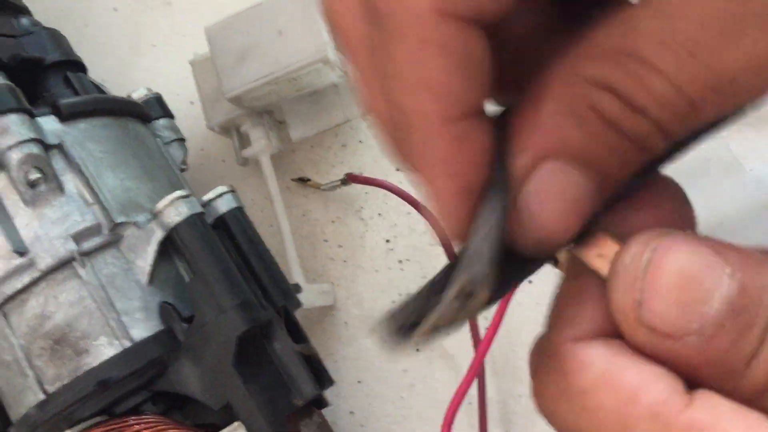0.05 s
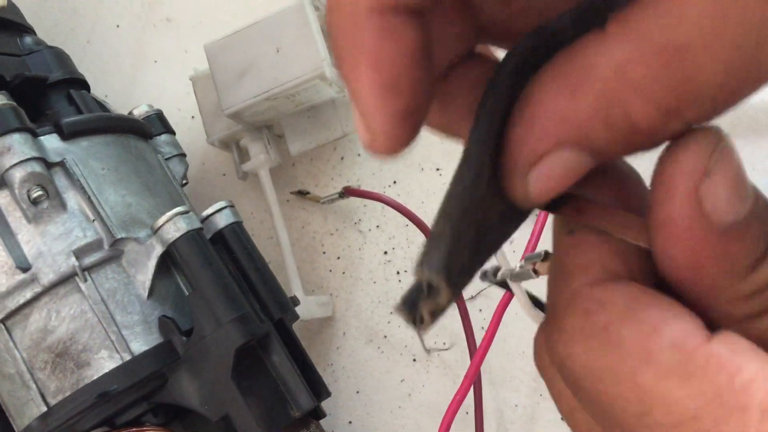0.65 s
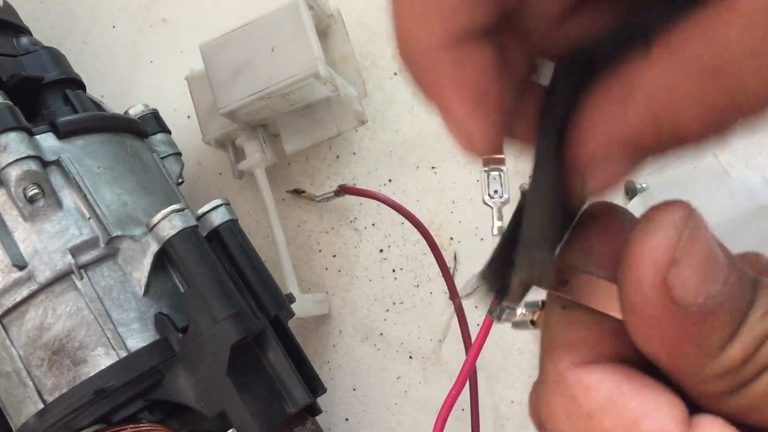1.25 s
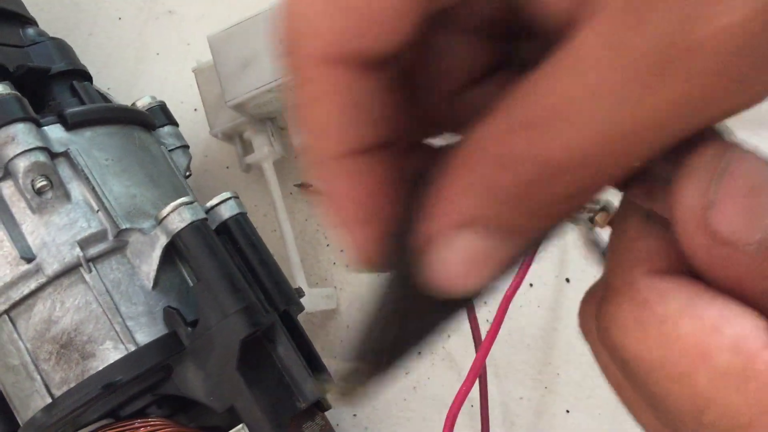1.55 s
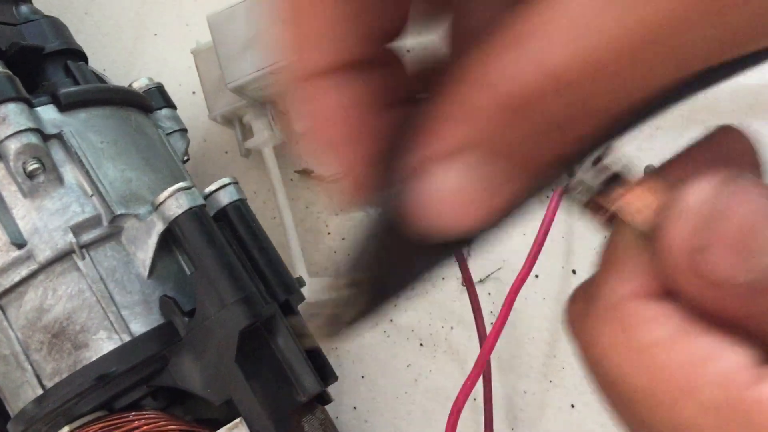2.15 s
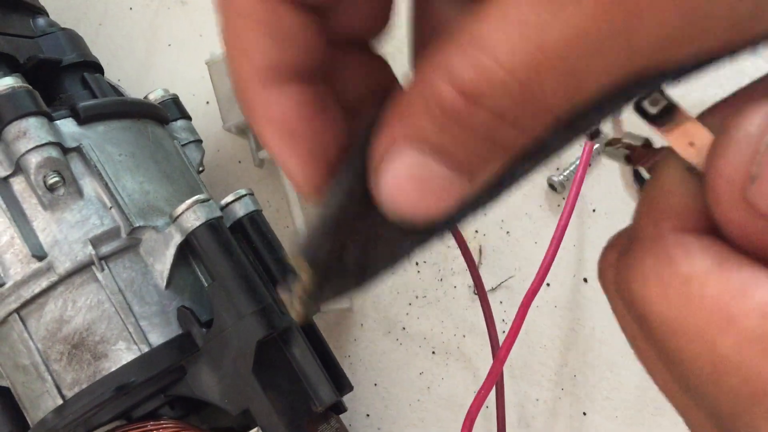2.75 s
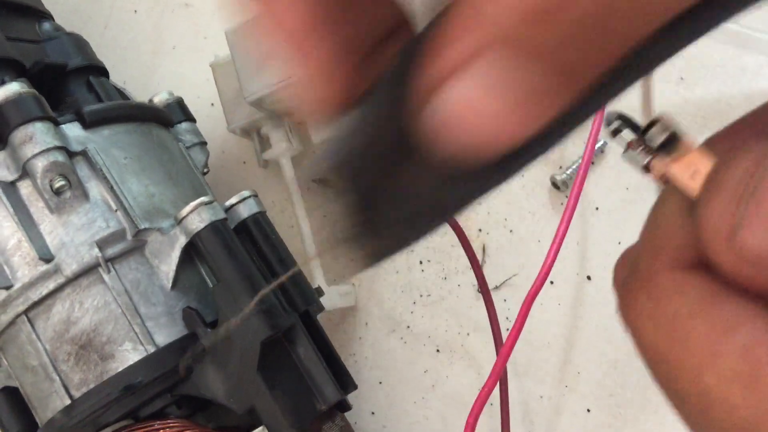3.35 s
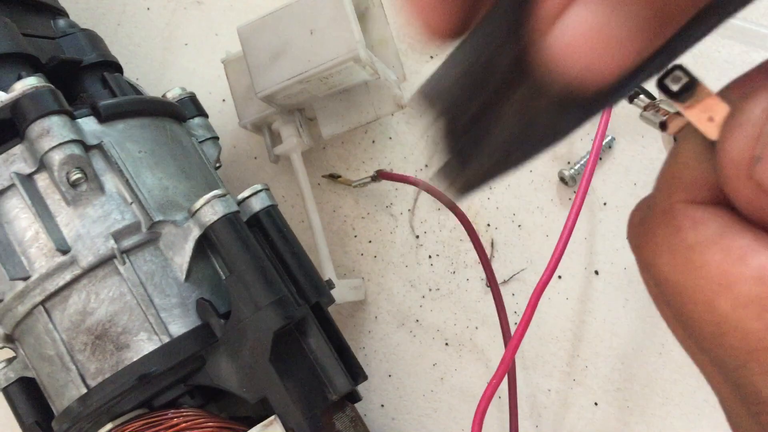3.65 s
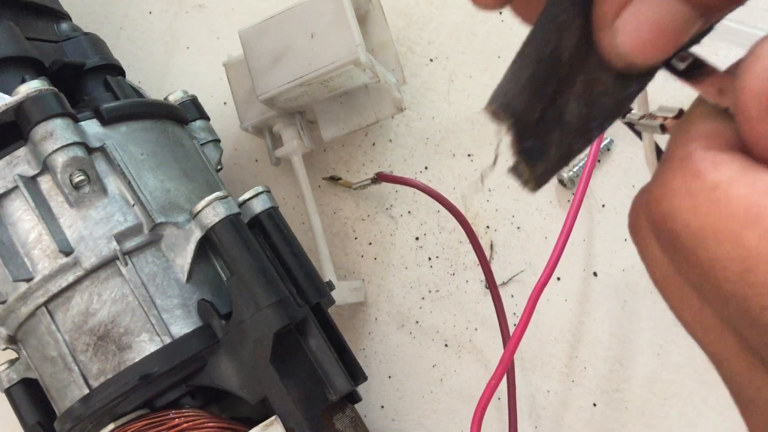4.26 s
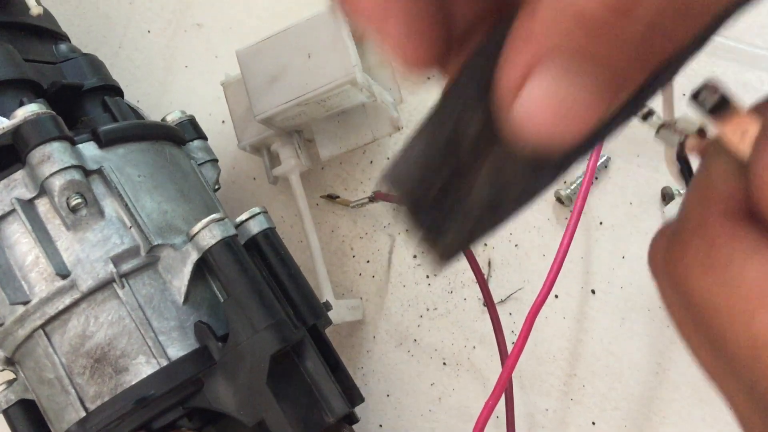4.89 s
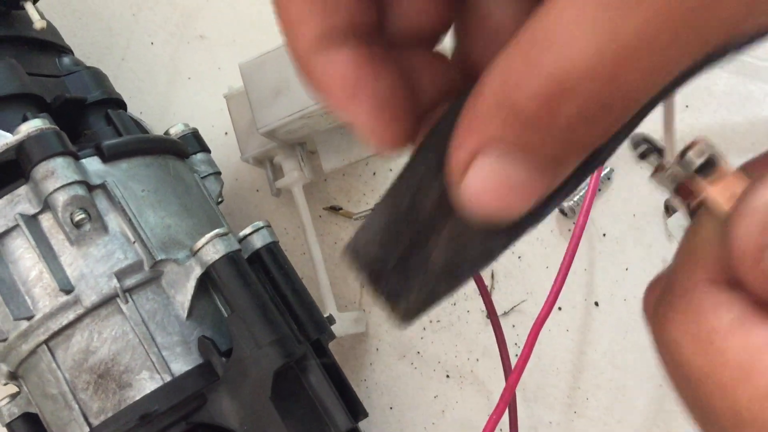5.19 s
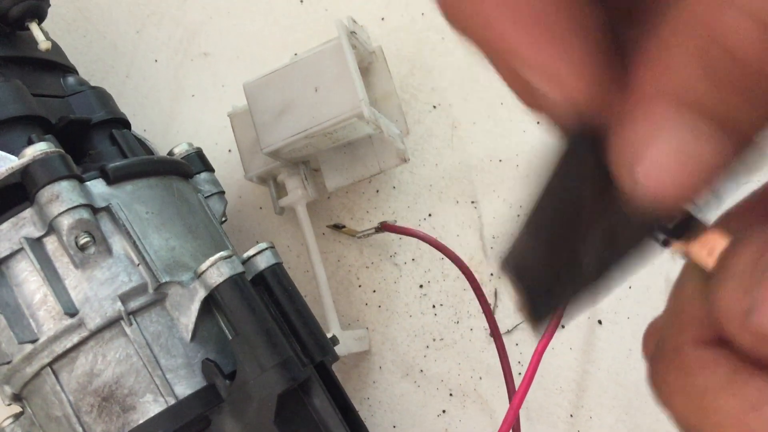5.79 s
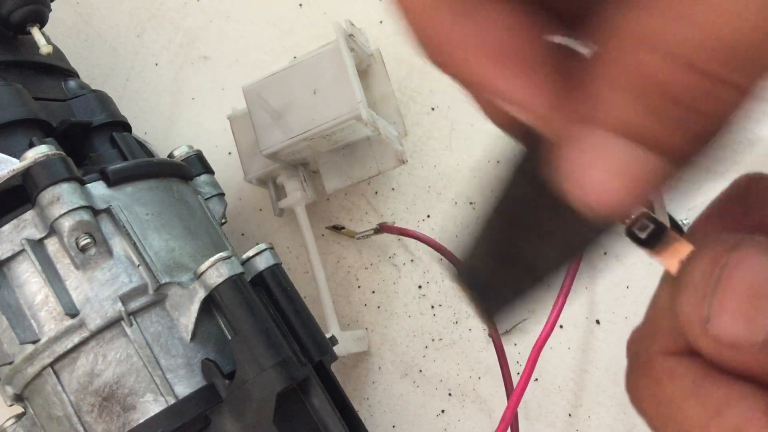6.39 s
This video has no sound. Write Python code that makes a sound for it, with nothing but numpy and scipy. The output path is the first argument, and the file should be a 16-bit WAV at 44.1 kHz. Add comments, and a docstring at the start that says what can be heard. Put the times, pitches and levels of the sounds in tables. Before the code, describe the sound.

Sandpaper rubs over a small metal contact in quick, scratchy strokes with short pauses, close by in a quiet room.

```python
"""Folded fine sandpaper is rubbed in quick strokes over a small hand-held metal contact, close by.
Its sound is friction noise, the sum of thousands of grain impacts a second. Each stroke lands with a
scuff, swells as the grit bites and lets go; many snag on the metal's edge, and the freed sheet flaps
with a soft thump. The paper's edge taps the metal, and a fingertip squeaks once by stick-slip.
A small room adds a short reverberant tail over a low background hum."""
import sys
import numpy as np
from scipy import signal
from scipy.fft import rfft, irfft, next_fast_len
from scipy.io import wavfile
from scipy.ndimage import uniform_filter1d

SR = 44100
rng = np.random.default_rng(int(sys.argv[2]) if len(sys.argv) > 2 else 0)


def master_out(mix):
    """Clip the mix to full scale and print it as 16-bit PCM to the path in sys.argv[1]."""
    frames = np.transpose(np.atleast_2d(mix))
    ceiling = np.clip(frames, -1, 1)
    pcm = np.round(ceiling * 32767).astype(np.int16)
    wavfile.write(sys.argv[1], SR, pcm)


N = 283563
FFT_SIZE = 2 * next_fast_len(N // 2 + 1)
TIME, FREQ = np.arange(N) / SR, np.fft.rfftfreq(FFT_SIZE, 1 / SR)


def gain_of(db):
    """The decibel scale: 20 dB is a factor of ten in amplitude."""
    return 10 ** (np.asarray(db) / 20)


def unit_rms(x):
    """Normalisation to a mean power of 1."""
    return x / np.sqrt(np.mean(x ** 2) + 1e-20)


def curve_at(points, hz):
    """Linear interpolation of (Hz, value) points on a log-frequency axis."""
    point_hz, value = np.transpose(points)
    return np.interp(np.log(hz + 1), np.log(point_hz + 1), value)


def coloured(x, gain):
    """Filtering as multiplication of the spectrum; the result has rms 1."""
    return unit_rms(irfft(rfft(x, FFT_SIZE) * gain, FFT_SIZE)[:N])


def noise(spectrum):
    """Stationary Gaussian noise shaped by (Hz, dB) points."""
    return coloured(rng.standard_normal(N), gain_of(curve_at(spectrum, FREQ)))


def wander(rate_hz):
    """Random modulation: low-pass noise of rms 1."""
    return coloured(rng.standard_normal(N), 1 / (1 + (FREQ / rate_hz) ** 4))


# Ambient room noise. Each row: frequency in Hz, relative spectral density in dB.
AIR_SPECTRUM = [(25, -47), (40, -32), (60, 4.5), (90, -9.5), (160, -2.5), (260, -4.5), (340, -14.5),
                (480, -19.5), (700, -14), (1100, -21), (2600, -26), (5000, -32.5), (9000, -34),
                (16000, -48)]
# Mains harmonics. Each row: frequency in Hz, level in dB.
HUM_PARTIALS = [(59.5, -68.5), (119, -66), (237, -74)]

def background(air_db=-60.5, waver_db=4.5):
    """Superposition of low room noise and mains hum whose harmonics waver independently."""
    hum = sum(gain_of(db + waver_db * wander(3.4)) * np.sin(2 * np.pi * (hz * TIME + rng.random()))
              for hz, db in HUM_PARTIALS)
    return gain_of(air_db) * noise(AIR_SPECTRUM) + np.sqrt(2) * hum


# Reverberation time. Each row: frequency in Hz, time to fall 60 dB in seconds.
ROOM_T60 = [(100, 0.67), (250, 0.48), (700, 0.25), (2500, 0.31), (6000, 0.38), (10000, 0.22), (16000, 0.45)]
# Colour of the reflections. Each row: frequency in Hz, relative level in dB.
REFLECTION_SPECTRUM = [(150, 9.5), (400, 11), (700, 11.5), (1500, 1), (2400, 3), (3600, -1), (6000, 3),
                       (16000, -4)]

def room(x, first_s=0.0021, reflections_per_s=5000):
    """Reverberation: convolution with sparse reflections, each band decaying at its own rate."""
    echoes = rng.choice([-1., 1.], SR) * (rng.random(SR) < reflections_per_s / SR)
    echoes *= np.arange(SR) > first_s * SR
    hz, t, spectra = signal.stft(echoes, SR, nperseg=256)
    fade_db = curve_at(REFLECTION_SPECTRUM, hz)[:, None] - 60 * t / curve_at(ROOM_T60, hz)[:, None]
    tail = signal.istft(spectra * gain_of(fade_db), SR, nperseg=256)[1]
    return signal.fftconvolve(x, tail / np.linalg.norm(tail))[:N]


# Rumble of the hands. Each row: frequency in Hz, relative spectral density in dB.
RUMBLE_SPECTRUM = [(30, -33), (62, 0), (78, -1), (100, -10), (160, -4), (400, -52)]

def hand_rumble(rest_db=-66, swing_db=-59, swing_s=0.12, lag_s=0.12, waver_db=2):
    """Amplitude-modulated noise: the low sound of the hands swells with the swing of each stroke."""
    hardest_db = max(crest_db for _, _, _, _, _, crest_db, *_ in RUB_STROKES)
    swings = sum(gain_of((crest_db - hardest_db) / 2) * np.exp(-((TIME - start - lag_s) / swing_s) ** 2)
                 for start, _, _, _, _, crest_db, *_ in RUB_STROKES)
    envelope = gain_of(rest_db) + gain_of(swing_db) * swings
    return envelope * gain_of(waver_db * wander(6.6)) * noise(RUMBLE_SPECTRUM)


def shifting_resonances(x, depth_db):
    """Time-varying filtering: resonances come and go as the touching point travels over the sheet."""
    spectra = signal.stft(x, SR, nperseg=256, noverlap=192)[2]
    patches = uniform_filter1d(rng.standard_normal(spectra.shape), size=2, axis=0)  # across frequency
    patches = uniform_filter1d(patches, size=22, axis=1)  # across time
    spectra *= gain_of(depth_db * np.clip(unit_rms(patches), -2, 2))
    return signal.istft(spectra, SR, nperseg=256, noverlap=192)[1][:N]


# Fingers shifting on the paper. Each row: time in seconds, relative level in dB.
FINGER_LEVELS = [(0.0, -57), (0.09, -74), (0.5, -73), (1.02, -67), (1.4, -75), (1.65, -74), (1.84, -74),
                 (2.0, -74), (2.45, -61.5), (2.6, -66), (2.88, -87), (2.96, -76), (4.33, -63.5),
                 (4.58, -77), (4.99, -72), (5.51, -75.5), (5.66, -82), (6.43, -67)]
# Skin rubbing paper. Each row: frequency in Hz, relative spectral density in dB.
SKIN_SPECTRUM = [(400, 5), (900, -15), (1600, 3), (2900, 6.5), (3900, 1), (5000, -7.5), (7000, -9),
                 (10000, -47), (16000, -26)]

def finger_rub(level_db=-3, flicker_db=1, ticks_per_s=6, tick_db=27):
    """Sliding friction of skin on paper: faint noise with a stray tick of grit now and then."""
    ticks = (rng.random(N) < ticks_per_s / SR) * rng.standard_normal(N) * gain_of(tick_db)
    slide = rng.standard_normal(N) / gain_of(flicker_db * wander(31))
    rub = shifting_resonances(slide + ticks, depth_db=5)
    envelope = gain_of(level_db + np.interp(TIME, *np.transpose(FINGER_LEVELS)))
    return envelope * coloured(rub, gain_of(curve_at(SKIN_SPECTRUM, FREQ)))


# A slipping fingertip. Each row: time in seconds, pitch in Hz, level in dB.
SQUEAK_GLIDE = [(2.09, 1155, -65.5), (2.097, 1000, -48), (2.105, 743, -62.5), (2.114, 610, -52),
                (2.134, 590, -70)]

def finger_squeak(jitter=0.112):
    """Stick-slip oscillation of skin on paper: a brief, uneven, falling tone."""
    times, hz, db = np.transpose(SQUEAK_GLIDE)
    cycles = np.cumsum(np.interp(TIME, times, hz) * (1 + jitter * wander(405))) / SR
    envelope = gain_of(np.interp(TIME, times, db)) * (TIME > times[0]) * (TIME < times[-1])
    return envelope * np.sqrt(2) * np.sin(2 * np.pi * cycles)


def struck(blows, modes, rise_s, detune):
    """Free vibration: each (seconds, dB) blow rings damped modes, detuned by the changing grip."""
    t, out = np.arange(SR // 2) / SR, np.zeros(N + SR)
    for start, blow_db in blows:
        ring = np.zeros(len(t))
        for hz, db, t60 in modes:
            cycles = rng.normal(1, detune) * hz * t + rng.random()
            ring += gain_of(db - 60 * t / t60) * np.sin(2 * np.pi * cycles)
        out[round(start * SR):][:len(t)] += gain_of(blow_db) * (1 - np.exp(-t / rise_s)) * ring
    return out[:N]


# Modes of the held sheet. Each row: frequency in Hz, relative level in dB, T60 in seconds.
FLAP_MODES = [(130.3, -9.5, 0.31), (170.7, 0.5, 0.14), (205.5, -10.5, 0.12), (259.8, -4.5, 0.13),
              (341, -7.5, 0.065), (403, -34.5, 0.19), (630.5, -14, 0.092), (796, -9.5, 0.055)]

def sheet_flaps(ease_share=0.5, slip_db=-43):
    """Elastic release: the sheet springs free as each stroke eases off and when the fingertip slips."""
    releases = [(start + skid + press + ease_share * ease, flap_db)
                for start, skid, press, ease, *_, flap_db in RUB_STROKES]
    slip_s = np.mean(SQUEAK_GLIDE, axis=0)[0]
    return struck(releases + [(slip_s, slip_db)], FLAP_MODES, rise_s=0.0019, detune=0.031)


# Flicks of paper on the contact. Each row: start in seconds, relative level in dB.
CONTACT_FLICKS = [(5.5342, -10.5)]
# Modes of the contact. Each row: frequency in Hz, relative level in dB, T60 in seconds.
CONTACT_MODES = [(2320, -3.5, 0.0061), (5580, -1.5, 0.0045), (5950, -5, 0.016), (8630, -3.5, 0.0069),
                 (9800, -10, .006)]

def contact_ring():
    """Damped resonance: the flicked metal rings only briefly between the fingers."""
    return struck(CONTACT_FLICKS, CONTACT_MODES, rise_s=0.0003, detune=0.003)


# Grit on metal. Each row: frequency in Hz, relative spectral density in dB.
GRIT_SPECTRUM = [(250, -11.5), (490, -14), (700, 0.5), (1050, -3.5), (1400, -2.5), (2100, -2), (3300, 0),
                 (3900, -5), (5000, -10), (6200, -5.5), (7800, -9), (9200, -5), (10400, -13.5),
                 (12500, -12), (15800, -21)]
# Resonances of paper and pinched contact. Each row: centre in Hz, bandwidth in Hz, lift in dB.
GRIT_RESONANCES = [(865, 240, -0.5), (1310, 35, 3.5), (2043, 760, 7), (2975, 110, 3), (4430, 770, 6),
                   (5610, 410, 4), (8730, 320, 2.5)]

def grit(per_s, spread_db, clump_db, clump_hz, body_top_hz=1300, fizz_foot_hz=4500):
    """Shot noise of uneven grains striking in clumps, in three bands: low body, mid rasp, high fizz."""
    sizes = gain_of(spread_db * np.minimum(rng.exponential(1, N), 4))
    hits = rng.choice([-1, 1], N) * sizes * (rng.random(N) < per_s / SR)
    hits *= gain_of(clump_db * np.clip(wander(clump_hz), -2, 2))
    hits = shifting_resonances(hits, depth_db=3)
    lift_db = sum(db / (1 + (2 * (FREQ - hz) / width) ** 2) for hz, width, db in GRIT_RESONANCES)
    colour = gain_of(curve_at(GRIT_SPECTRUM, FREQ) + lift_db)
    body = 1 / (1 + (FREQ / body_top_hz) ** 8)
    below_fizz = 1 / (1 + (FREQ / fizz_foot_hz) ** 8)
    return np.array([coloured(hits, colour * band) for band in (body, below_fizz - body, 1 - below_fizz)])


def band_gains(body_db, fizz_db):
    """Constant-power mix of body, rasp and fizz, with levels relative to the rasp."""
    gains = gain_of([body_db, np.zeros_like(body_db), fizz_db])
    return gains / np.linalg.norm(gains, axis=0)


def burst(bands, peak_s, rise_s, fall_s, body_db, fizz_db):
    """A noise transient: dense grit under an envelope that rises and decays exponentially."""
    on, out = abs(TIME - peak_s) < 0.03, np.zeros(N)
    t = TIME[on] - peak_s
    envelope = np.exp(-np.where(t < 0, -t / rise_s, t / fall_s))
    grains = band_gains(body_db, fizz_db) @ bands[:, on]
    out[on] = np.sqrt(np.mean(envelope ** 2)) * unit_rms(envelope * grains)
    return out


# Taps of the paper's edge. Each row: time in seconds, relative peak level in dB.
EDGE_TAPS = [(0.1555, -32.5), (0.8604, -53), (0.8767, -22.5), (0.97, -45), (1.0066, -44), (1.0854, -36),
             (1.111, -36), (4.41, -45), (4.4229, -26), (4.4865, -31)]

def edge_taps(bands, level_db=-3.5):
    """Impact noise: the paper's stiff edge hits the metal; the sound starts at once and dies away."""
    return sum(gain_of(level_db + db)
               * burst(bands, peak_s, rise_s=0.00013, fall_s=0.0022, body_db=-7.5, fizz_db=6.5)
               for peak_s, db in EDGE_TAPS)


# Snags on the metal's edge. Each row: time in seconds, relative peak level in dB, share of the snag
# spent building up, fizz in dB relative to the rasp.
EDGE_SNAGS = [(0.233, -31.5, .65, -24), (0.24, -34, 0.85, -5), (1.18, -48.5, 0, -6),
              (1.321, -38, 0.15, -15), (1.663, -36, 0.2, -21), (1.672, -21.5, 0.56, 0.5),
              (1.694, -28, 0.76, 8), (1.964, -27.5, 0.4, -3), (1.98, -30.5, 0, -1),
              (2.241, -28.5, 0.23, -6), (2.274, -20.5, 0.71, -4), (2.557, -26.5, 0.2, 9),
              (2.822, -24, 0.3, 1.5), (3.084, -25.5, 0.9, 4), (3.099, -26.5, 0.2, -2),
              (3.122, -34.5, 0.8, 1), (4.9118, -27, 0.2, -15), (4.93, -33, .7, -3),
              (5.2156, -28.5, 0.66, 5), (5.534, -19.5, .65, -2), (5.7751, -23, 0.78, -0.5),
              (5.9665, -23, 0.9, 6.5), (6.1757, -23, 0.83, -1.5), (6.3827, -24.5, 0.46, -1)]

def edge_snags(bands, level_db=-1, snag_s=0.0048, body_db=-23.5):
    """Stress build-up and release: grains pile up against the metal's edge and tear past it."""
    out = np.zeros(N)
    for peak_s, db, build_share, fizz_db in EDGE_SNAGS:
        rise_s = np.clip(build_share, 0.05, 0.95) * snag_s
        out += gain_of(level_db + db) * burst(bands, peak_s, rise_s, snag_s - rise_s, body_db, fizz_db)
    return out


# The flexing sheet. Each row: frequency in Hz, relative spectral density in dB.
FLEX_SPECTRUM = [(50, -45), (110, -5), (165, -0.5), (215, -13.5), (260, -10), (340, -20.5), (480, -16),
                 (900, -71)]
# Sandpaper strokes. Each row: start in seconds; skidding, pressing and easing times in seconds;
# relative landing and crest levels in dB; body and fizz in dB relative to the rasp; relative flap in dB.
RUB_STROKES = [(0.19, 0.0039, 0.04, 0.0076, -46, -33.5, -11.5, -3, -41.5),
               (0.714, 0.0036, 0.028, 0.033, -54, -50, -12.5, -4, -63),
               (0.843, 0.02, .032, 0.021, -42.5, -50.5, -6, -3, -46.5),
               (0.978, 0.0083, 0.0071, 0.0228, -41.5, -44.5, -9, -9, -42.5),
               (1.087, 0.0059, 0.025, 0.038, -48, -45, -5, -1, -49.5),
               (1.31, .027, 0.03, 0.044, -44.5, -44.5, -2.5, 3.5, -61),
               (1.627, 0.0078, 0.034, 0.047, -31.5, -33.5, -4, -6.5, -55),
               (1.859, 0.048, 0.06, 0.054, -45, -34, 0, -2.5, -41),
               (2.187, .026, 0.051, 0.0044, -44, -33.5, 2.5, -2, -51),
               (2.482, 0.02, 0.053, .04, -42.5, -33.5, -4, -7, -72),
               (2.758, 0.011, 0.051, .045, -43, -32, -1.5, -3, -46),
               (3.023, 0.0076, 0.045, 0.056, -36, -31, -2.5, -4.5, -38),
               (3.287, .014, .054, 0.033, -40.5, -33, -1.5, -4, -40),
               (3.569, 0.00716, .035, 0.053, -33, -35.5, 0.5, -5.5, -44),
               (4.315, .035, .025, 0.024, -59, -59, -9, -9, -56),
               (4.457, 0.0064, 0.02, 0.021, -44, -45.5, -2, -9, -45.5),
               (4.54, .004, 0.015, .012, -49, -53, -6, -11.5, -75),
               (4.818, .022, .078, 0.0229, -43.5, -39.5, -0.5, -2, -40),
               (5.146, .042, 0.025, 0.0067, -45, -36.5, -2, -13, -36),
               (5.482, 0.0093, 0.048, 0.0053, -48, -36, -0.5, -3, -34.5),
               (5.734, 0.015, .026, 0.0036, -46.5, -37, 0.5, -5, -35),
               (5.935, 0.0096, 0.026, 0.0036, -39.5, -31, 3.5, -10, -31.5),
               (6.142, 0.011, 0.026, 0.0033, -40.5, -33, 7, 2, -31.5),
               (6.348, 0.0074, .026, 0.0057, -38.5, -36, -1, -4.5, -31.5)]

def sandpaper_strokes(level_db=-0.76, swell_db=11.5, fade_db=15, brighten_db=2.5, flex_db=-10.5,
                      judder_db=2, scuff_rise_s=0.0013, scuff_share=0.67,
                      attack_s=0.00027, release_s=0.0047):
    """Abrasive friction under a changing load: a light touch fizzes, hard pressing rasps."""
    fine = grit(per_s=16000, spread_db=4, clump_db=1.5, clump_hz=300)
    coarse = grit(per_s=260, spread_db=2.5, clump_db=-1.5, clump_hz=60)
    bands = fine + gain_of(-9) * coarse  # a few coarse grains catch and crackle
    flex, judder = noise(FLEX_SPECTRUM), gain_of(judder_db * wander(52))
    out = np.zeros(N)
    for start, skid, press, ease, landing_db, crest_db, body_db, fizz_db, _ in RUB_STROKES:
        rub_s = press + ease
        on = (TIME >= start) & (TIME < start + skid + rub_s + 10 * release_s)
        age = TIME[on] - start
        grains = np.array([unit_rms(band[on]) for band in bands]) * judder[on]
        # The stroke lands with a thin, bright scuff that lasts a share of the skid.
        landing = (1 - np.exp(-age / scuff_rise_s)) * np.exp(-(age / (scuff_share * skid)) ** 2)
        out[on] += gain_of(landing_db) * landing * (band_gains(body_db=-6, fizz_db=4.5) @ grains)
        # Then the rub swells, fades and grows brighter.
        t = np.maximum(age - skid, 0)
        press_db = np.interp(t, [0, press, rub_s], [-swell_db, 0, -fade_db])
        bright_db = brighten_db * (np.minimum(t / rub_s, 1) - 0.5)
        touch = (1 - np.exp(-t / attack_s)) * np.exp(-np.maximum(t - rub_s, 0) / release_s)
        # Pressure couples the grains to the sheet's low resonances; the fizz hardly needs it.
        mix = band_gains(body_db - bright_db + 0.087 * press_db, fizz_db + bright_db - 0.13 * press_db)
        scrape = gain_of(press_db) * (mix * grains).sum(axis=0)
        flexing = gain_of(flex_db + press_db / 2) * unit_rms(flex[on])
        out[on] += gain_of(crest_db) * touch * (scrape + flexing)
    return gain_of(level_db) * out


def scene(scrape_room_db=-15.5, flap_room_db=-14.5):
    """Direct and reverberant fields add; this close to the sandpaper, the direct sound dominates."""
    scrape = sandpaper_strokes()
    edge_grit = grit(per_s=22000, spread_db=4, clump_db=2.5, clump_hz=700)
    scrape += edge_snags(edge_grit) + edge_taps(edge_grit) + finger_squeak() + contact_ring()
    flaps = sheet_flaps()
    to_room = gain_of(scrape_room_db) * scrape + gain_of(flap_room_db) * flaps
    # The hands keep moving, so the pattern of reflections keeps changing.
    angle = 2 * np.pi * TIME
    tail = room(to_room * np.cos(angle)) + room(to_room * np.sin(angle))
    return (scrape + flaps + tail + finger_rub() + hand_rumble() + background())[None]


def record(dry, bass_cut_hz=50, top_hz=15950):
    """Band limiting: the microphone cuts the bass and the recorder cuts the highest treble."""
    highpass = signal.butter(4, bass_cut_hz, "highpass", fs=SR, output="sos")
    lowpass = signal.firwin(401, top_hz, window=("kaiser", 8), fs=SR)
    return signal.oaconvolve(signal.sosfilt(highpass, dry), lowpass[None], "same")


dry = scene()
out = record(dry)
master_out(out)
```